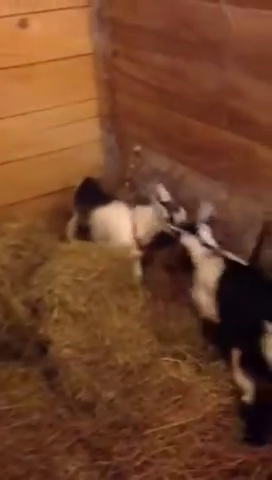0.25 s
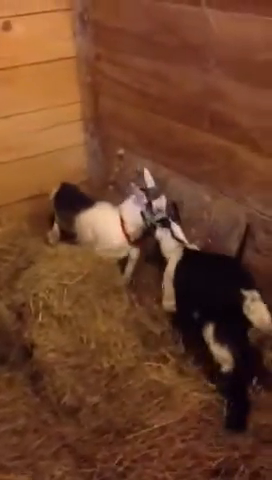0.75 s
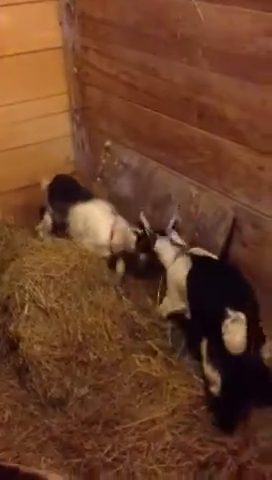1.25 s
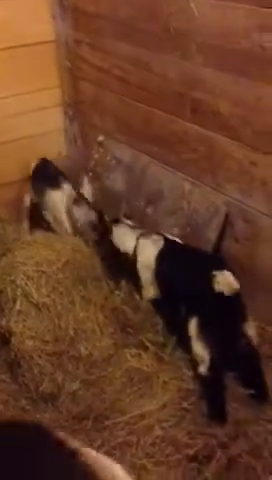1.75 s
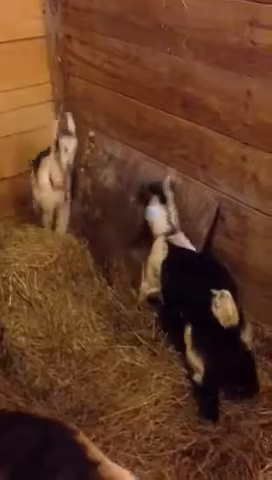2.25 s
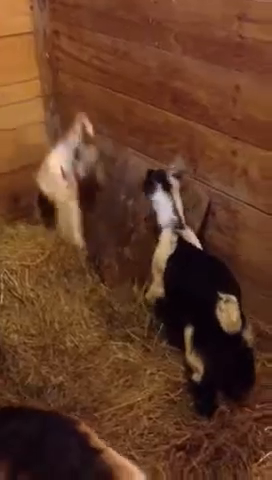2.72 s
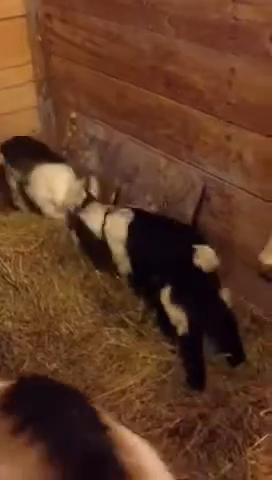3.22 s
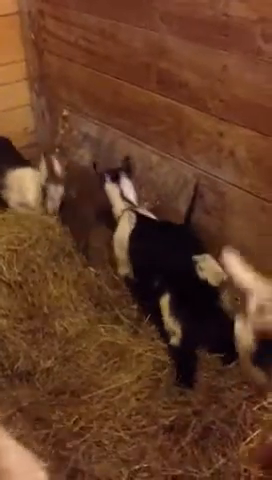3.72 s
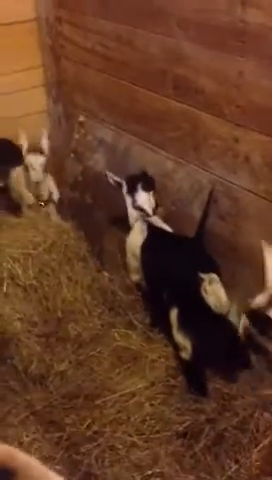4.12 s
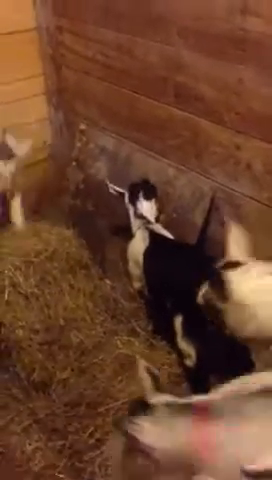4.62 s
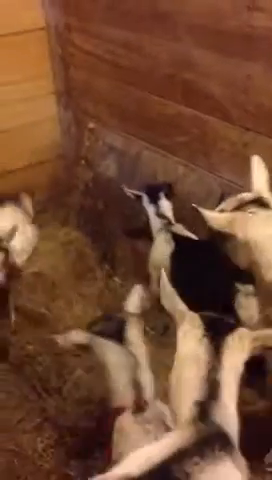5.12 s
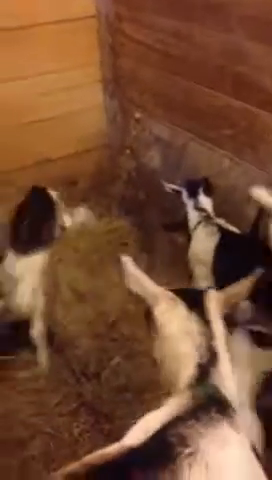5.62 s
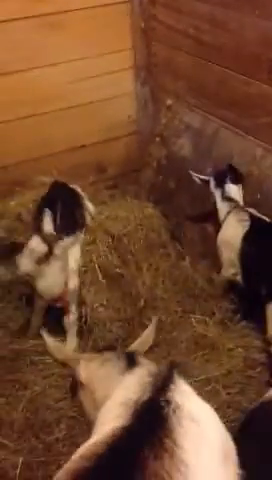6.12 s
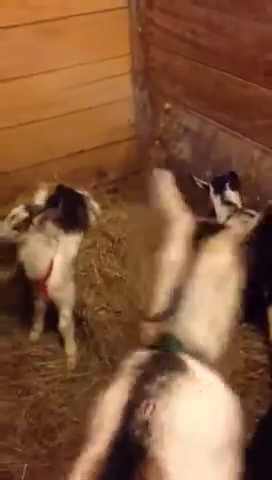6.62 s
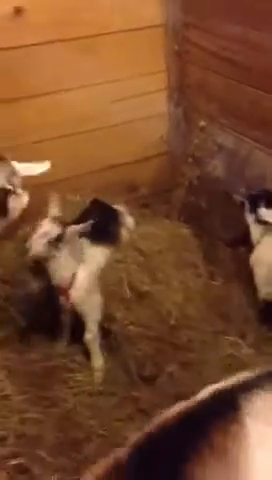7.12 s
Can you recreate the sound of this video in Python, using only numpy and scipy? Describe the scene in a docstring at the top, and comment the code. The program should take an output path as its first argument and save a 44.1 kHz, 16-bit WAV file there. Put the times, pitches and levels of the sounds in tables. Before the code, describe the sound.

Dry straw hisses and crackles throughout while goat hooves strike boards in irregular bursts, some dull and muffled, others hard and clacking. Soft rumbling steps and coat brushing fill the gaps, with a few tiny hoof skids and very faint nasal tones. Knocks cluster around 4.5 seconds, straw swells from five to six, then a hard knock lands. Close, mono phone pickup in a small barn.

```python
"""Young goats jump and scuffle in a straw-bedded wooden pen, close to a phone with one microphone.
Straw rustles throughout (dense clicks in a hiss) and bodies shuffle on the boards (low modes, brushing noise).
Hooves knock from the start (many touches ring board modes), with a few skids and faint nasal hums (narrow noise).
From about 5 to 6 s the rustle is fuller; around 6.4 s comes a hard knock, and blows go on almost to the end.
The small barn adds a short tail to hooves and skids; the microphone port favours 5 and 12 kHz."""
import sys
import numpy as np
from scipy import signal
from scipy.fft import rfft, irfft
from scipy.io import wavfile
from scipy.ndimage import uniform_filter1d

SR = 44100
rng = np.random.default_rng(int(sys.argv[2]) if len(sys.argv) > 2 else 0)


def waveform_to_disk(signal):
    """Save audio, clipped to [-1, 1], as 16-bit WAV at the path in sys.argv[1]."""
    frames = np.transpose(np.atleast_2d(signal))
    scaled = np.clip(frames, -1, 1) * 32767
    samples = np.round(scaled).astype(np.int16)
    wavfile.write(sys.argv[1], SR, samples)


N = 324487  # samples

# ringing modes of the pen boards: f/Hz, level/dB, time to fall 60 dB/s (before extra damping)
BOARD_MODES = [(105, -3, .12), (125, -2, .12), (146, 0, .12), (172, 0, .13), (196, 2, .14), (224, 1, .12),
               (262, 1, .11), (300, 1, .09), (345, 0, .07), (405, -2, .06), (460, -1, .05), (515, 0, .05),
               (570, 0, .045), (640, 0, .045), (720, 0, .04), (830, 0, .03), (960, 0, .025),
               (1090, 0, .022), (1250, 0, .02), (1355, 0, .02), (1540, 0, .018), (1700, 0, .016),
               (1900, 0, .015), (2100, 0, .014), (2310, 0, .013), (2600, 0, .012), (2900, 0, .011),
               (3200, 0, .01), (3550, 0, .01), (3900, 0, .009)]


def undb(db):
    """Turn decibels into an amplitude factor."""
    return 10 ** (np.asarray(db) / 20)


def level(x, db=0):
    """Scale a signal to a given average (RMS) level in dB."""
    return x * undb(db) / np.sqrt(np.mean(x ** 2))


def colour(x, points):
    """Shape the spectrum of a signal by (f/Hz, gain/dB) points; outside them it is 90 dB down."""
    hz, db = np.transpose(points)
    f = np.fft.rfftfreq(len(x), 1 / SR) + 1  # + 1 avoids log(0)
    gain_db = np.interp(np.log(f), np.log(hz), db, left=-90, right=-90)
    return irfft(rfft(x) * undb(gain_db), len(x))


def walk(rate):
    """Wander at random: levels held for 1 / rate seconds, then smoothed twice."""
    hold = int(SR / rate)
    steps = np.repeat(rng.standard_normal(N // hold + 1), hold)
    smooth = uniform_filter1d(uniform_filter1d(steps, hold), hold)
    return 1.3 * smooth[:N]  # 1.3 makes up for the spread lost in smoothing


def add(track, s, x):
    """Mix a sound into a track, starting at s seconds."""
    i = max(int(s * SR), 0)
    track[i:i + len(x)] += x[:len(track) - i]


def grains(rate, spread_db):
    """Scatter clicks of either sign, rate per second, a few much larger than the rest."""
    happens = rng.random(N) < rate / SR
    return happens * rng.standard_normal(N) * undb(spread_db * rng.exponential(size=N))


def curve(rows):
    """Join (t/s, level/dB) points by straight lines."""
    return np.interp(np.arange(N) / SR, *np.transpose(rows))


def effort(calm_db, rows, column):
    """Each movement swells and dies away as a bell over the calm level; powers add."""
    t = np.arange(N) / SR
    power = undb(calm_db) ** 2
    for row in rows:
        bell = np.exp(-(3.3 * (t - row[0]) / row[1]) ** 2)
        power = power + undb(row[column]) ** 2 * bell
    return 10 * np.log10(power)


def hooves():
    """Each blow: a cloven hoof scuffs down in many touches that ring the boards; horn and crushed stalks crack."""
    # hoof blows: t/s, thud peak/dB, thud f/Hz, knock peak/dB, knock f/Hz,
    # clack peak/dB, clack f/Hz, crack peak/dB, contact/ms (peaks before the barn's tail)
    blows = [(0.053, -28, 345, -39.5, 416, -37, 1000, -41, 3.1),
             (0.202, -43, 160, -55, 950, -48, 1070, -42, 10),
             (0.345, -39.5, 310, -43, 900, -60, 1000, -46, 12),
             (0.393, -56, 350, -40, 540, -58, 1380, -31.5, 17),
             (0.453, -27, 177, -31, 377, -30, 1820, -23.5, 7.3),
             (0.568, -38.5, 170, -41, 750, -67, 1080, -39.5, 11),
             (0.7, -28.5, 263, -22.5, 560, -29, 1100, -38, 6),
             (0.999, -34, 295, -29, 493, -28, 1020, -46, 6.5),
             (1.152, -68, 177, -55, 980, -52, 1460, -35, 9.4),
             (1.165, -35, 188, -33.5, 436, -46, 1200, -34, 8.7),
             (1.577, -32, 150, -28, 377, -32.5, 1320, -40, 5.5),
             (1.907, -36, 201, -48, 410, -52, 1360, -52, 10),
             (2.061, -36.5, 254, -43, 640, -58, 1580, -52, 17),
             (2.089, -37.5, 253, -38.5, 690, -54, 1060, -41.5, 13),
             (2.576, -30, 215, -37, 428, -57, 1160, -46, 33),
             (2.623, -33.5, 200, -36.5, 370, -33, 2130, -21, 11),
             (2.799, -37.5, 190, -30.5, 650, -55, 1000, -29.5, 28),
             (3.025, -44, 177, -46.5, 360, -67, 1410, -48, 13),
             (3.123, -35, 172, -36, 380, -44, 1320, -39, 20),
             (3.3, -43.5, 190, -38.5, 1010, -31, 2570, -30, 14),
             (3.339, -48, 189, -46, 382, -55, 2400, -32, 9.5),
             (3.38, -38, 233, -36, 410, -46, 1330, -51, 14),
             (3.865, -42, 190, -35.5, 570, -40, 1130, -49, 6.9),
             (4.001, -48, 193, -47, 610, -47, 1340, -61, 16),
             (4.085, -49, 178, -38, 353, -64, 1010, -45, 5),
             (4.12, -39, 207, -34, 416, -30.5, 1420, -49, 6),
             (4.385, -28, 189, -29, 696, -54, 1210, -36, 7.2),
             (4.501, -25, 224, -23.5, 782, -24, 1310, -32.5, 7),
             (4.597, -31, 188, -33, 633, -40, 1680, -62, 7.8),
             (4.825, -43.5, 210, -61, 498, -52, 1360, -47, 7.6),
             (4.926, -31.5, 290, -30.5, 640, -32.5, 1150, -56, 4.4),
             (5.336, -46.5, 140, -58, 990, -72, 1370, -50, 10),
             (5.491, -30.5, 196, -37, 740, -51.5, 1100, -36.5, 11),
             (5.653, -26.5, 293, -35, 378, -39, 1000, -41, 5.4),
             (5.941, -32, 206, -69, 915, -39, 1400, -44, 8.4),
             (6.106, -25, 250, -29.5, 754, -31.5, 1690, -37, 9.4),
             (6.254, -43.5, 264, -73, 400, -65, 1060, -53, 12),
             (6.326, -46.5, 188, -52, 382, -59, 1420, -53, 19),
             (6.404, -31, 304, -19.5, 770, -31, 1360, -26, 2.3),
             (6.509, -51, 300, -43.5, 825, -45.5, 1510, -67, 9.8),
             (6.727, -29, 273, -24.5, 760, -27, 1290, -42, 6.7),
             (6.83, -69, 186, -47, 760, -63, 1020, -34, 8),
             (7.126, -29.5, 220, -33.5, 340, -33, 1660, -35, 9.4),
             (7.263, -43, 198, -50, 800, -61, 1310, -40, 11)]
    # colour of cracking horn and stalks: f/Hz, level/dB per Hz
    crack_colour = [(2500, -19.5), (3400, -7.5), (4300, -2), (5200, 7.5), (6200, -12.5), (8000, -17),
                    (10000, -34), (12000, -21.5), (15000, -41)]
    damping = 1.4  # the bedding shortens the ringing
    crunch_offset_db = -1.5  # crunch against the mean of clack and crack
    out, t = np.zeros(N), np.arange(int(.08 * SR)) / SR
    # the animal's weight arrives as one soft shove
    push = -np.sin(np.pi * np.arange(int(0.0011 * SR)) / int(0.00079 * SR))
    for s, thud_db, thud_hz, knock_db, knock_hz, clack_db, clack_hz, crack_db, contact_ms in blows:
        crunch_db = (clack_db + crack_db) / 2 + crunch_offset_db
        chance = rng.standard_normal((len(BOARD_MODES), 2))
        contact = np.exp(-(t / (contact_ms / 1000 + 1e-4)) ** 3.0)
        happens = rng.random(len(t)) < 5000 / SR  # 5000 touches per second
        touches = contact * rng.standard_normal(len(t)) * happens * 0.5
        touches[0] = -1  # the first touch is always there
        thud = signal.fftconvolve(ring(thud_hz, .33, chance, damping), push)
        knock = signal.fftconvolve(ring(knock_hz, 0.5, chance, damping), press(touches, 2.06 * knock_hz))
        clack = signal.fftconvolve(ring(clack_hz, 0.27, chance, damping), press(touches, 2.9 * clack_hz))
        crunch = signal.fftconvolve(ring(2430, 1.0, chance, damping), press(touches, 4500))
        onset = np.minimum(t / 0.00114, 1)
        crack = contact * onset * colour(rng.standard_normal(len(t)), crack_colour)
        layers = ((thud, thud_db), (knock, knock_db), (clack, clack_db), (crunch, crunch_db), (crack, crack_db))
        blow = np.zeros(int(.33 * SR))
        for sound, db in layers:
            add(blow, 0, sound * undb(db) / np.max(np.abs(sound)))
        add(out, s, barn(blow))
    return out


def ring(centre_hz, octaves, chance, damping=0.82):
    """The board modes near a centre ring and die away; chance weights and detunes each one for every place."""
    hz, db, t60 = (column[:, None] for column in np.transpose(BOARD_MODES))
    t = np.arange(int(.25 * SR)) / SR
    near = np.exp(-.5 * (np.log2(hz / centre_hz) / octaves) ** 2)
    gain = near * undb(db + 1.5 * chance[:, :1])
    detune = 1 + .04 * chance[:, 1:]
    decay = np.exp(-np.log(1000) * t * damping / t60)
    return np.sum(gain * decay * np.sin(2 * np.pi * hz * detune * t), axis=0)


def press(touches, hz):
    """Each touch presses and releases within one period, so it mostly excites modes near that pitch."""
    u = np.arange(int(SR / hz)) / int(SR / hz)
    return np.convolve(touches, np.sin(2 * np.pi * u) * np.sin(np.pi * u))


def skids():
    """A hoof sticks and slips along a board: unevenly spaced pulses ring its modes."""
    # skids: start t/s, length/s, slips per s, ring f/Hz, level/dB, bright ring f/Hz, its level/dB
    slides = [(0.387, 0.041, 165, 480, -45.5, 990, -63), (1.792, 0.084, 118, 540, -52, 1530, -62),
              (4.024, 0.13, 120, 740, -59, 1500, -84), (7.069, 0.024, 350, 774, -43.5, 3580, -50)]
    out = np.zeros(N)
    for s, length, rate, low_hz, low_db, bright_hz, bright_db in slides:
        chance = rng.standard_normal((64, 2))
        gaps = (1 + 0.206 * chance[:, 0]).clip(.3) / rate
        times = np.cumsum(gaps)
        on = times < length
        strength = undb(0.72 * chance[:, 1]) * np.sin(np.pi * times / length)  # swells and fades
        slips = np.zeros(int(length * SR) + 1)
        slips[(times[on] * SR).astype(int)] = strength[on]
        for hz, db in ((low_hz, low_db), (bright_hz, bright_db)):
            sound = signal.fftconvolve(slips, ring(hz, 0.26, chance[:len(BOARD_MODES)]))
            add(out, s, barn(sound * undb(db) / np.std(sound[:len(slips)])))
    return out


def straw():
    """Countless stalks snap and slide: fine dense clicks within a hiss, coming in small flurries."""
    # straw stirred all the while: t/s, rustle level/dB
    stirring = [(0, -52.5), (.3, -50.5), (.6, -50), (.8, -56.5), (1.3, -53), (1.9, -49.5), (2.5, -53),
                (3.2, -53.5), (3.7, -57), (4.3, -54.5), (4.6, -54.5), (4.95, -47), (5.3, -46.5),
                (5.9, -44.5), (6.3, -53.5), (6.9, -55), (7.2, -47), (7.36, -51)]
    # legs sweeping through the straw: middle t/s, length/s, rustle level/dB
    leg_sweeps = [(0.217, .12, -48), (0.404, 0.28, -46), (0.935, 0.27, -51.5), (1.21, 0.092, -55),
                  (1.485, 0.13, -44.5), (1.863, 0.1, -50.5), (2.29, .15, -52), (2.773, 0.2, -47.5),
                  (2.859, 0.062, -42.5), (3.09, 0.23, -52.5), (3.387, 0.18, -50.5), (3.756, .06, -54.5),
                  (4.047, 0.056, -47), (4.182, 0.23, -48.5), (4.275, 0.11, -48), (4.712, 0.2, -46.5),
                  (4.78, 0.12, -42.5), (5.005, 0.15, -45), (5.117, 0.32, -47.5), (5.65, 0.082, -50),
                  (5.916, 0.054, -61), (6.151, 0.063, -46), (6.346, 0.19, -52), (6.6, 0.074, -53),
                  (6.825, 0.14, -52), (6.994, 0.18, -51), (7.313, .1, -44.5)]
    # brightness: t/s, sheen level against the rustle/dB
    brightness = [(0, -20), (.3, -10), (.6, -16.5), (.9, -10), (1.5, -11), (2.1, -9), (2.5, -11),
                  (3.2, -7.5), (3.6, -7.5), (4.3, -9), (5.1, -9), (5.7, -10), (6.3, -9), (7, -8),
                  (7.36, -8.5)]
    # colour of the main rustle: f/Hz, level/dB per Hz
    rustle_colour = [(880, -19), (1500, -19.5), (1970, -18.5), (2230, -17.5), (2400, -19), (3480, -16),
                     (5260, 0.5), (5810, -6.5), (6690, -19), (9160, -29.5), (10800, -31), (14000, -53),
                     (22000, -120)]
    # colour of the bright sheen: f/Hz, level/dB per Hz
    sheen_colour = [(6180, -9.5), (10500, -22.5), (12000, -6.5), (14000, -10), (15200, -10.5)]
    stalks = level(grains(4000, 1.4)) + 1.5 * rng.standard_normal(N)  # clicks and hiss
    stalks = stalks * undb(0.54 * walk(35) + 1.06 * walk(80))  # flurries
    rustle = level(colour(stalks, rustle_colour))
    sheen = undb(curve(brightness)) * level(colour(stalks, sheen_colour))
    return undb(effort(curve(stirring), leg_sweeps, column=2)) * (rustle + sheen)


def shuffle():
    """Small steps keep the low board modes rumbling; coats and legs brush wood and bedding."""
    # scuffles against the boards: middle t/s, length/s, rumble level/dB, brushing level/dB
    scuffles = [(0.117, 0.19, -61, -60), (0.476, 0.17, -45, -53), (0.725, 0.31, -59, -59.5),
                (1.06, 0.16, -59, -58.5), (1.325, .15, -62, -77), (1.497, 0.069, -67, -54),
                (1.61, 0.25, -52.5, -55), (1.837, 0.25, -51.5, -57), (2.084, 0.1, -72, -60),
                (2.688, 0.15, -54, -69), (2.855, 0.21, -56, -57), (3.082, 0.3, -57.5, -66.5),
                (3.397, 0.21, -53, -57), (3.948, .2, -53, -72.5), (4.09, 0.29, -47, -54.5),
                (4.548, 0.38, -67, -59), (4.99, .2, -61, -62), (5.655, .2, -45.5, -62),
                (5.967, 0.41, -56.5, -62), (6.173, 0.37, -62, -63), (6.68, 0.63, -60, -61),
                (7.14, 0.28, -62, -56), (7.334, 0.17, -65, -58)]
    # colour of the brushing: f/Hz, level/dB per Hz
    brush_colour = [(250, 3.5), (450, -1.5), (700, -0.5), (1200, -6), (2000, -14), (3200, -8),
                    (4500, -10.5)]
    calm_rumble_db, calm_brush_db = -69, -65.5
    steps = level(grains(120, 1.5)) + .8 * rng.standard_normal(N)
    plain = np.zeros((len(BOARD_MODES), 2))  # modes as listed, no chance
    rumble = signal.fftconvolve(steps, ring(196.0, 0.23, plain))[:N]
    brush = level(grains(900, 1.5)) + 1.3 * rng.standard_normal(N)
    brush = level(colour(brush * undb(2.2 * walk(35)), brush_colour))
    rumble_gain = undb(effort(calm_rumble_db, scuffles, column=2))
    brush_gain = undb(effort(calm_brush_db, scuffles, column=3))
    return rumble_gain * level(rumble) + brush_gain * brush


def hums():
    """Breath through one narrow resonance: a blurred, nearly level tone."""
    # faint nasal hums of the animals: start t/s, length/s, pitch f/Hz, width/Hz, level before fading in and out/dB
    nasal_tones = [(0.158, 0.11, 1030, 150, -58.5), (5.812, 0.077, 880, 30, -60),
                   (7.164, 0.19, 833, 40, -58)]
    out = np.zeros(N)
    for s, length, hz, width, db in nasal_tones:
        u = np.linspace(0, 1, int(length * SR))
        resonance = [(hz - 4 * width, -30), (hz - width, -6), (hz, 0), (hz + width, -6), (hz + 4 * width, -30)]
        tone = colour(rng.standard_normal(len(u)), resonance)
        add(out, s, level(tone, db) * np.sqrt(np.sin(np.pi * u).clip(0)))
    return out


def air():
    """A low stir of air: deep noise whose strength wanders slowly."""
    stir = rng.standard_normal(N) * undb(5.7 * walk(3.04))
    return level(colour(stir, [(15, -10), (24, 5), (40, -13), (70, -37), (120, -70)]), -43)


def barn(x):
    """Direct sound, then a dense tail, longest in the low middle; every spot in the pen has its own."""
    # tail by band: f/Hz, time to fall 60 dB/s, level/dB
    tail_bands = [(167.5, 0.17, 5), (480, 0.22, -5.5), (1570, 0.13, 1), (5100, 0.14, -2)]
    t = np.arange(int(.3 * SR)) / SR
    onset = np.minimum(t / 0.00083, 1)
    response = np.zeros(len(t))
    for hz, t60, db in tail_bands:
        shape = [(hz / 4, -30), (hz / 1.8, -3), (hz, 0), (hz * 1.8, -3), (hz * 4, -30)]
        band = colour(rng.standard_normal(len(t)), shape)
        decay = np.exp(-np.log(1000) * t / t60)
        response += band * decay * onset * undb(db) / np.sqrt(t60 * SR / 14)  # root evens out tail energy
    response[0] = 1  # direct sound
    return signal.fftconvolve(x, response)


def scene():
    """Mix all the sounds, the same in both channels."""
    mono = hooves() + skids() + straw() + shuffle() + hums() + air()
    return np.array([mono, mono])


def record(dry):
    """The phone cuts the bass steeply below 118 Hz and the top above 15.4 kHz."""
    thin = signal.sosfilt(signal.butter(4, 118, "high", fs=SR, output="sos"), dry)
    return signal.sosfilt(signal.ellip(12, .2, 70, 15400, fs=SR, output="sos"), thin)


dry = scene()
out = record(dry)
waveform_to_disk(out)
```